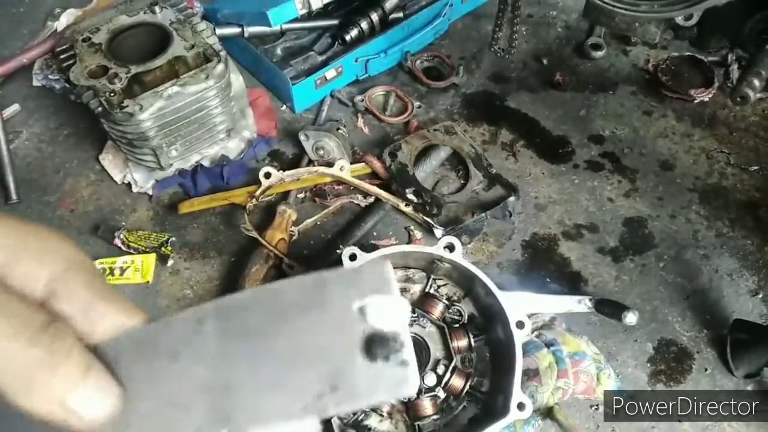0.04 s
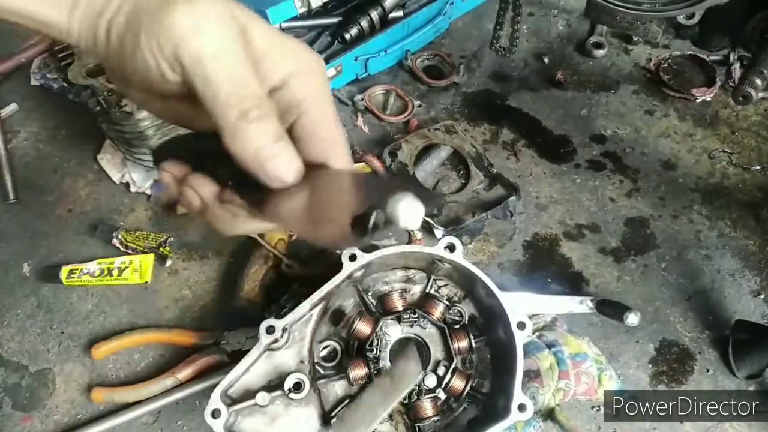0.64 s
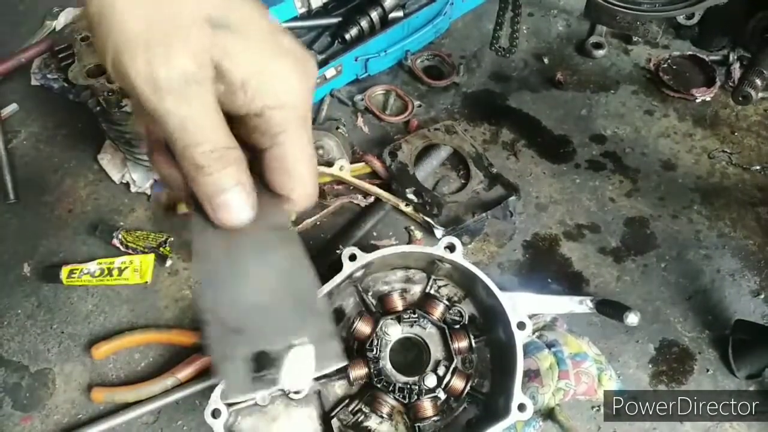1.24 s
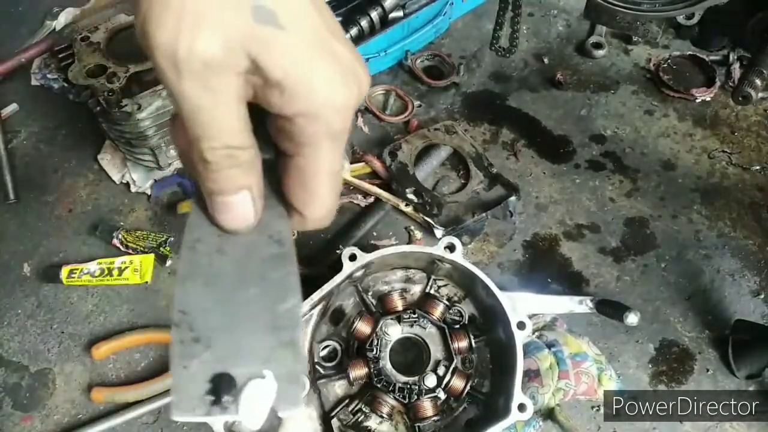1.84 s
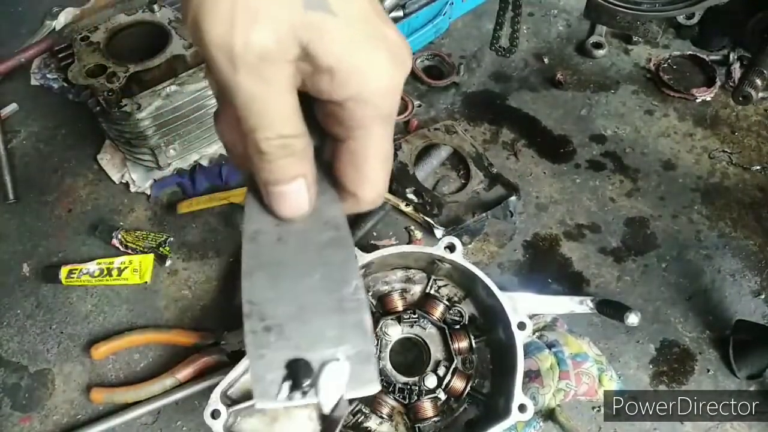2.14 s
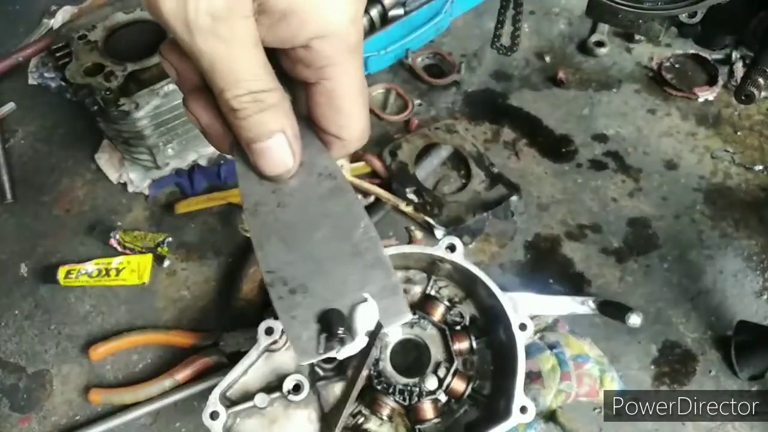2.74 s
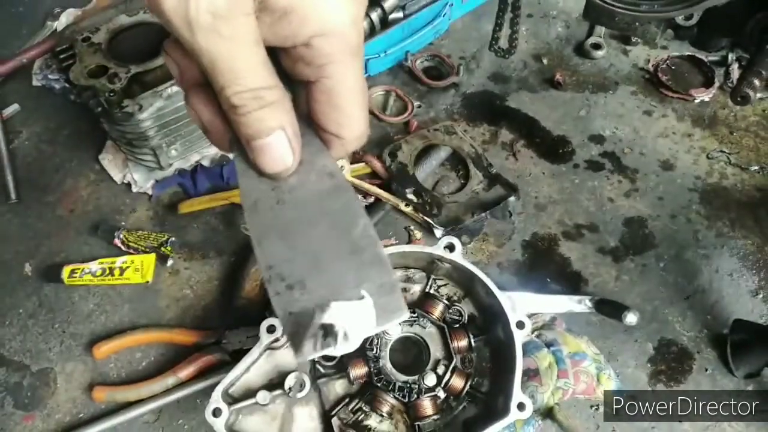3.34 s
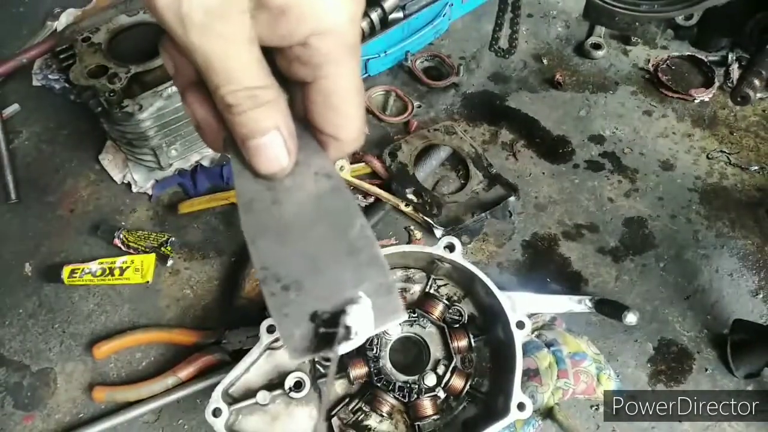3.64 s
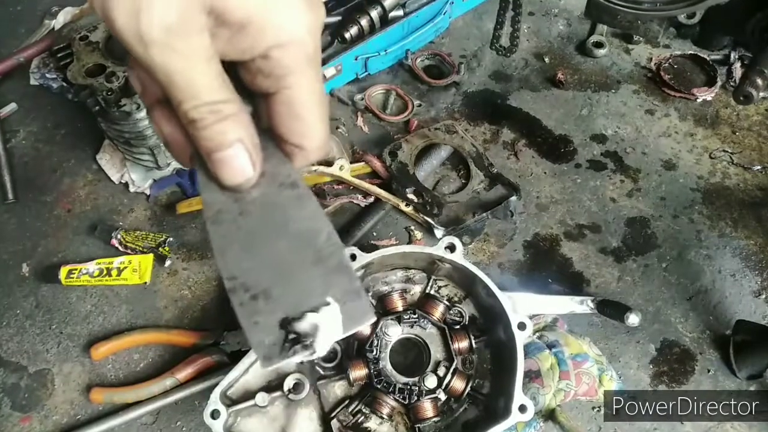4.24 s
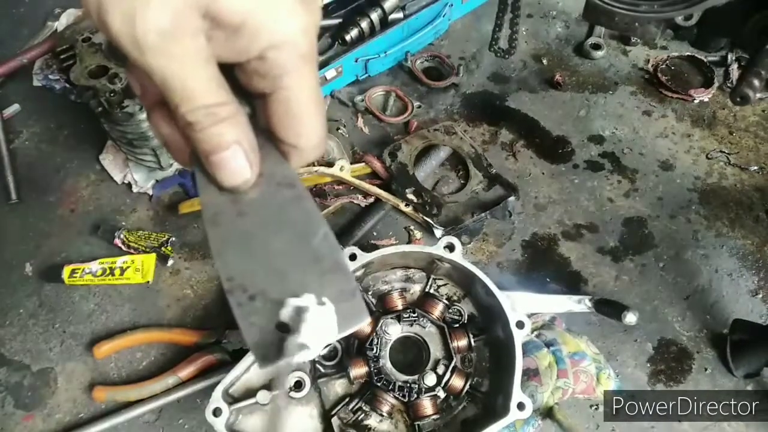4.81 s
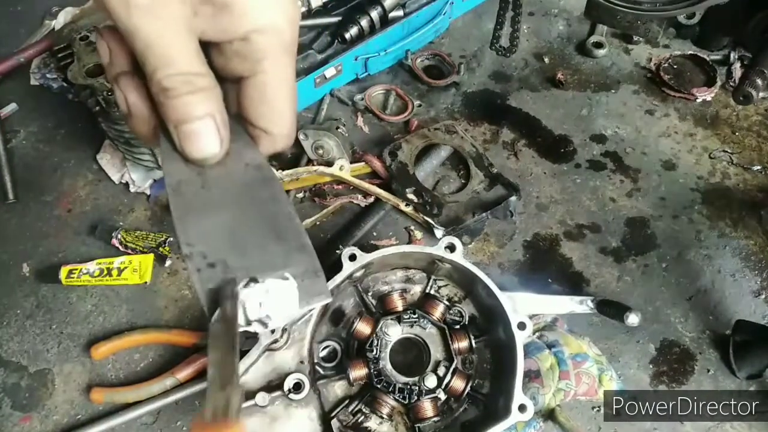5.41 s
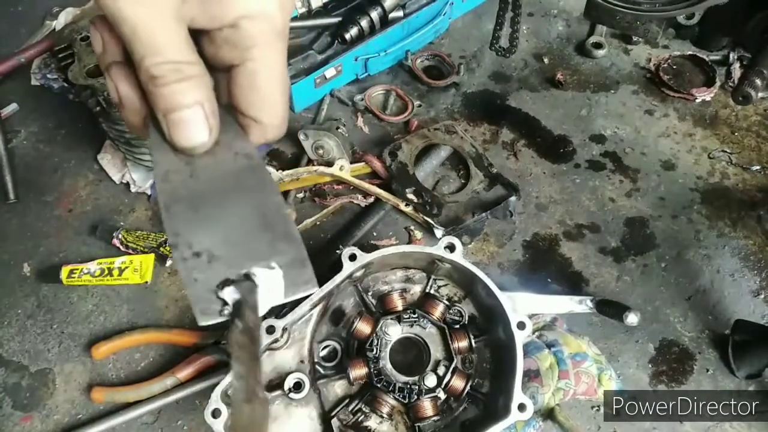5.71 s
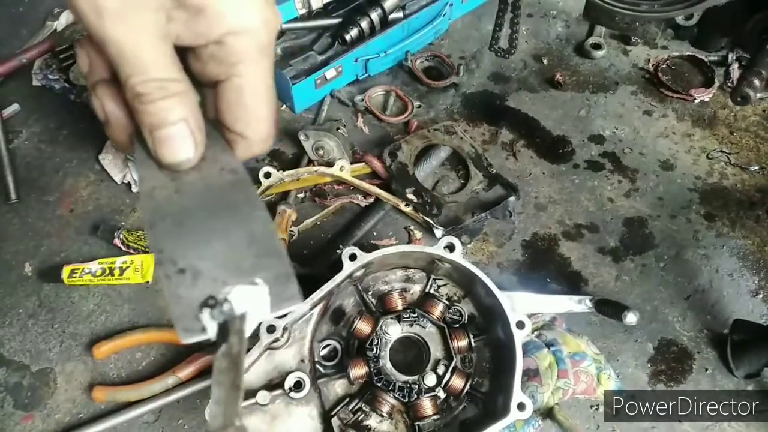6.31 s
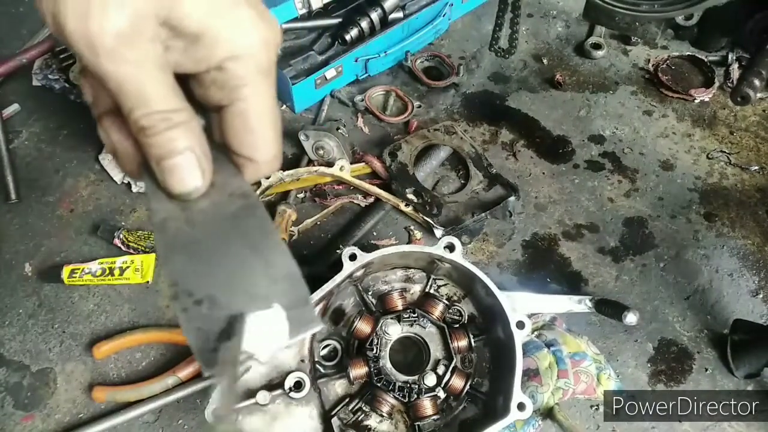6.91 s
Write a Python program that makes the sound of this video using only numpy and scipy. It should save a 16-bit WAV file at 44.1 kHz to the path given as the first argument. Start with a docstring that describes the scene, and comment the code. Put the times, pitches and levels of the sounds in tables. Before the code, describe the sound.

An air compressor hums with a fast, honking pulse in a workshop, with a few metal knocks and uneven hissing spurts near the end.

```python
"""Workshop air compressor

A piston compressor pumps twelve times a second. On each stroke its reed valve, a thin springy flap,
flutters in a short honk that the walls throw back. Intake air hisses over the motor's hum and rumble.
Metal parts are knocked and slid now and then; near the end air is blown in uneven spurts."""
import sys
import numpy as np
from scipy import signal
from scipy.fft import rfft, irfft
from scipy.io import wavfile
from scipy.ndimage import uniform_filter1d

SR = 44100
rng = np.random.default_rng(int(sys.argv[2]) if len(sys.argv) > 2 else 0)


def store_pcm(level_fs):
    """Save levels as 16-bit WAV."""
    pcm = np.round(np.clip(level_fs, -1, 1) * 32767).astype(np.int16)
    wavfile.write(sys.argv[1], SR, np.atleast_2d(pcm).T)


N = 315756
TIME = np.arange(N) / SR
FREQ = np.fft.rfftfreq(N, 1 / SR)
STROKE_HZ, BELT_HZ, FIRST_STROKE_S = 12.0104, 5.72, .0358


# The tones in the reed's flutter: multiple of its pitch, level/dB
REED_TONES = [(1, -10.3), (2, -14.2), (3, -29)]
# How hard the reed slaps: t/s, overtone boost/dB
REED_SLAP = [(0, 0.5), (1, -.5), (4.3, -0.8), (5.2, 1.1), (7.16, 0.9)]
def valve(slap_s=0.0053, wobble_s=0.00019, pitch_scatter=0.0044, scatter_db=0.59):
    """Each stroke lifts the reed; it flutters, sinking in pitch as the flow dies."""
    open_s, rise_s, fall_s, start_hz, end_hz = .0283, .0037, .0113, 362.2, 302.7
    stroke = np.floor((TIME - FIRST_STROKE_S) * STROKE_HZ + .5).astype(int)
    pitch_luck, level_luck = rng.standard_normal((stroke[-1] + 1, 2))[stroke].T
    due = FIRST_STROKE_S + stroke / STROKE_HZ
    # the uneven drive belt makes strokes come a hair early and late
    age = np.clip(TIME - due - wobble_s * np.cos(2 * np.pi * BELT_HZ * due), 0, open_s)
    lift = np.minimum(age / rise_s, 1) * np.minimum((open_s - age) / fall_s, 1)
    cycles = age * (start_hz + (end_hz - start_hz) * age / (2 * open_s))
    cycles *= 1 + pitch_scatter * pitch_luck
    # overtones build up only as the reed starts to slap its seat
    slap = amp(np.interp(TIME, *np.transpose(REED_SLAP))) * np.minimum(age / slap_s, 1)
    flutter = sum(amp(db) * (slap if k > 1 else 1) * np.sin(2 * np.pi * k * cycles)
                  for k, db in REED_TONES)
    return lift * flutter * amp(scatter_db * level_luck)


# The direct sound and its echoes: left delay/ms, right delay/ms, level/dB
ECHO_PATHS = [(.42, 0, 0), (1.26, .97, .7), (4.03, 3.63, -10.4), (5.15, 5.29, -12.3), (14.67, 15.4, -8.1),
              (15.94, 16.16, -12.5), (25.51, 25.99, -12.9), (27.94, 27.96, -9.4), (33.71, 33.55, -13.4),
              (53.23, 53.37, -15.4)]
def honk(pan_db=-0.45, rasp_db=-18, ring_db=-9, pipe_hz=677, pipe_width_hz=26):
    """The valve echoes off the walls; its flutter and swirling air keep the intake pipe ringing."""
    reed = valve()
    pipe = resonance(pipe_hz, pipe_width_hz)
    echoes = sum(amp(db) * np.exp(-2j * np.pi * FREQ * np.array([[left], [right]]) / 1000)
                 for left, right, db in ECHO_PATHS)
    rasp = shape(np.abs(reed) * diffuse(alike_hz=1500), pipe ** 2)
    tone = shape(reed, echoes * (1 + amp(ring_db) * pipe)) * amp([[pan_db], [-pan_db]])
    return tone + amp(rasp_db) * tone.std() * unit(rasp)


def spurt(start_s, rise_s, hold_s, db, fall_db_per_s=128):
    """One spurt of air opens evenly, holds, then dies as the pressure bleeds away."""
    age = TIME - start_s
    opening = np.clip(age / rise_s, 0, 1)
    return opening * amp(db - fall_db_per_s * np.maximum(age - rise_s - hold_s, 0))


# Spurts of air: t/s, rise/s, hold/s, level/dB
AIR_SPURTS = [(5.767, 0.1, .02, -16.5), (5.934, 0.018, 0.025, -14.2), (6.025, .125, .09, -11),
              (6.328, 0.016, 0.022, -13.7), (6.448, 0.014, .015, -18), (6.543, .01, 0.0046, -22.5),
              (6.596, 0.06, 0.17, -24), (6.799, 0.019, .01, -14.5), (6.898, 0.013, 0.041, -15),
              (7.09, .04, .03, -29)]
# The tone of the jet's hiss: f/Hz, relative level/dB
JET_SPECTRUM = [(300, -22), (900, 5), (1200, -4), (1600, 4), (2300, 3.5), (2550, 9), (2900, 0),
                (4500, -1.5), (6000, 3.5), (9000, 2), (11500, -0.5), (14000, -3)]
def jet(level_db=-3, sputter_db=1.1, ring_db=30, ring_width_hz=55):
    """Air hisses in spurts over a metal tool and makes it sing faintly."""
    flow = np.sqrt(sum(spurt(*row) ** 2 for row in AIR_SPURTS))
    metal = 1 + sum(amp(ring_db + db) * resonance(hz, ring_width_hz) for hz, db, _ in TOOL)
    hiss = shape(diffuse(), colour(JET_SPECTRUM) * metal)
    hiss = flicker(clutter(hiss, echo_db=-1.0), depth_db=2.5, rate=28)
    return unit(hiss) * flow * amp(level_db + sputter_db * walk(70))


def draught(level_db=-29, hz=98, width_hz=24, start_s=6.33, rise_s=0.37):
    """Blown air makes a low flutter on the microphone."""
    flutter = unit(shape(diffuse(), np.exp(-((FREQ - hz) / width_hz) ** 2)))
    return flutter * amp(level_db) * np.clip((TIME - start_s) / rise_s, 0, 1)


# The ringing tones of four things: f/Hz, level/dB, time to fade by 60 dB/s
TOOL = [(1203, -23.5, 0.22), (2710, -38, 0.27), (3010, -29, 0.36), (5200, -38, .38), (6160, -46, 0.27),
        (6540, -46, .3), (6900, -38, .22), (8160, -38, .25), (11170, -24, 0.23)]
CASING = [(249, -19, .16), (294, -7, 0.088), (385, -16, 0.21), (702, -14.5, 0.12), (944, -26, .2),
          (1494, -26, 0.4), (1527, -23.5, 0.25), (2680, -40, 0.34), (3200, -44, .15)]
BLOCK = [(205, -26, .15), (435, -12.5, 0.12), (470, -17.5, 0.17)]
PIN = [(6580, -35, 0.24), (9916, -22, 0.4)]
# Knocks: t/s, thing, ring level/dB, clatter level/dB, clatter brightness/Hz, clatter fade time/s
KNOCKS = [(1.194, TOOL, -18, -25, 2500, 0.11), (1.845, PIN, 2, -38, 9100, .1),
          (2.099, TOOL, 3, -12, 5520, 0.28), (2.704, BLOCK, 4.5, -25, 550, 0.35),
          (3.337, CASING, 5, -14.5, 680, 0.29), (3.373, CASING, -6, -22, 700, 0.32)]
def knocks(contact_s=0.001, rattle_db=1.5, low_hz=170, crack_db=-2, crack_s=.005):
    """Each knock gives a brief crack, a rattle dying in the room, and the ring of the thing struck."""
    out = np.zeros((2, N))
    age = TIME[:SR]
    bass_cut = FREQ ** 2 / (FREQ ** 2 + low_hz ** 2)
    for s, thing, ring_db, clatter_db, bright_hz, fade_s in KNOCKS:
        ring = sum(amp(db - 60 * age / ring_s)
                   * np.sin(2 * np.pi * hz * age + rng.uniform(-1, 1, (2, 1)))
                   for hz, db, ring_s in thing)
        tone = bass_cut / (1 + 1j * FREQ / bright_hz) / (1 + 1j * FREQ / (4 * bright_hz))
        rattle = unit(clutter(shape(diffuse(), tone))) * amp(rattle_db * walk(300))
        crack = 1 + amp(crack_db) * np.exp(-age / crack_s)
        clatter = rattle[:, :SR] * amp(clatter_db - 60 * age / fade_s) * crack
        start = int(s * SR)
        out[:, start:start + SR] += (amp(ring_db) * ring + clatter) * (1 - np.exp(-age / contact_s))
    return out


# Slides, timed at their loudest point: t/s, length/s, level/dB
SLIDES = [(0.806, 0.073, -33), (0.897, 0.052, -34), (1.208, 0.1, -28.5), (1.276, .12, -30.5),
          (5.078, 0.24, -28.5), (5.48, 0.2, -34)]
# The tone of the scraping: f/Hz, relative level/dB
SCRAPE_SPECTRUM = [(150, -50), (520, 5), (800, 0), (1300, -3.5), (2500, -15.5), (6000, -19.5), (14000, -46)]
def scuffs(grain_db=3):
    """Things slid over the floor make short, gritty scrapes."""
    push = sum(amp(db) * np.exp(-(2 * (TIME - s) / length) ** 2) for s, length, db in SLIDES)
    return unit(shape(diffuse(), colour(SCRAPE_SPECTRUM))) * push * amp(grain_db * walk(200))


def throb(depth_db, peak_s=0.048):
    """A gain that swells with every turn of the crank."""
    return amp(depth_db * np.cos(2 * np.pi * STROKE_HZ * (TIME - peak_s)))


# The hiss of air drawn in: f/Hz, level/dB
INTAKE_SPECTRUM = [(1000, -84), (2200, -79.5), (4000, -85.5), (5500, -89), (7000, -74), (8000, -74.5),
                   (9500, -81), (14000, -80)]
def intake():
    """Air is sucked in with a hiss that swells on each stroke."""
    return flicker(air(INTAKE_SPECTRUM), depth_db=2.5, rate=18) * throb(depth_db=3.5)


# The motor's rumble: f/Hz, level/dB
RUMBLE_SPECTRUM = [(20, -93), (38, -91), (65, -61), (105, -51), (150, -52.5), (270, -50.5), (400, -59.5),
                   (550, -67), (760, -50.5), (900, -65), (1200, -69), (2000, -73), (3700, -82.5),
                   (14000, -80)]
# Motor and bearing tones: f/Hz, level/dB
MOTOR_TONES = [(119.8, -34), (107.9, -44.5), (72.7, -43.5), (6665, -56)]
def motor(waver_db=2, waver_rad=.6, pan_db=-0.5):
    """The motor and its bearings hum, wavering a little, over a throbbing rumble."""
    rumble = air(RUMBLE_SPECTRUM) * throb(depth_db=1.2)
    hum = sum(amp(db + waver_db * walk(6)) * np.sin(2 * np.pi * hz * TIME + waver_rad * walk(9.9))
              for hz, db in MOTOR_TONES)
    return (rumble + np.sqrt(2) * hum) * amp([[pan_db], [-pan_db]])


# Steady background hiss, with a narrow dip near 3750 Hz: f/Hz, level/dB
BACKGROUND_SPECTRUM = [(300, -84), (2000, -76.5), (3450, -78), (3750, -83.5), (4050, -80.5), (4600, -77.5),
                       (5300, -77), (7000, -81.5), (9000, -77), (11500, -73), (14000, -75)]
def background_hiss():
    """A steady hiss lies behind everything."""
    return air(BACKGROUND_SPECTRUM)


def amp(db):
    """Turn decibels into a gain."""
    return 10 ** (np.asarray(db) / 20)


def unit(x):
    """Scale to an average (rms) level of 1."""
    return x / np.sqrt(np.mean(x ** 2))


def shape(x, response):
    """Filter a sound, giving each frequency its own gain."""
    return irfft(rfft(x) * response, N)


def colour(points):
    """Gain at every frequency from a few (Hz, dB) points."""
    hz, db = np.transpose(points)
    return amp(np.interp(np.log(FREQ + 1), np.log(hz), db))


def walk(rate):
    """A smooth random wander of about 1, turning `rate` times a second."""
    count = max(int(SR / rate), 2)
    steps = np.repeat(rng.standard_normal(N // count + 1), count)
    return uniform_filter1d(steps, count)[:N] * np.sqrt(1.5)


def diffuse(alike_hz=900, likeness=0.87):
    """White noise from all round: left and right share only its low notes."""
    share = likeness * np.sinc(FREQ / alike_hz)
    mid, side = (shape(rng.standard_normal(N), np.sqrt((1 + sign * share) / 2)) for sign in (1, -1))
    return np.array([mid + side, mid - side])


def air(points):
    """Noise from all round; the points give the level in each 1 Hz slice."""
    return shape(diffuse(), colour(points) * np.sqrt(SR / 2))


def resonance(hz, width_hz):
    """A filter that rings at one frequency, where its gain is 1."""
    return 1 / (1 + 2j * (FREQ - hz) / width_hz)


def clutter(x, echo_db=-5, span_s=.012, count=12):
    """Add many small echoes off tools and benches, different on the left and right."""
    taps = np.zeros((2, SR // 10))
    taps[:, 0] = 1
    for side in taps:
        delays = 1 + (rng.uniform(0, span_s, count) * SR).astype(int)
        side[delays] += amp(echo_db) * rng.choice([-1, 1], count) / np.sqrt(count)
    return signal.fftconvolve(x, taps, axes=1)[:, :N] / np.sqrt(1 + amp(echo_db) ** 2)


def flicker(x, depth_db, rate, count=14):
    """Swirling air makes each band of frequencies swell and fade on its own."""
    spectrum = rfft(x)
    place = np.interp(np.log(FREQ + 1), np.log([1000, 14000]), [0, count - 1])
    bands = (irfft(spectrum * np.maximum(1 - np.abs(place - k), 0), N) for k in range(count))
    return sum(band * amp(depth_db * walk(rate)) for band in bands)


def scene():
    """The compressor, the spurts of air and the handled parts, in stereo."""
    honks, suction, hum = honk(), intake(), motor()
    hiss = clutter(suction + background_hiss())
    return honks + hum + hiss + jet() + draught() + scuffs() + knocks()


def record(dry, left_hz=7500, right_hz=6850, left_q=3.87, right_q=6.36, ceiling=.86, top_hz=14100):
    """Each microphone opening is a tiny ringing hollow that lifts the treble."""
    hollows = np.array([1 / (1 - (FREQ / hz) ** 2 + 1j * FREQ / hz / q)
                        for hz, q in ((left_hz, left_q), (right_hz, right_q))])
    heard = shape(dry, hollows)
    rounded = heard / (1 + (heard / ceiling) ** 8) ** (1 / 8)  # soften the loudest peaks
    top_cut = signal.ellip(10, .2, 70, top_hz, fs=SR, output="sos")
    return signal.sosfilt(top_cut, rounded)


dry = scene()
out = record(dry)
store_pcm(out)
```